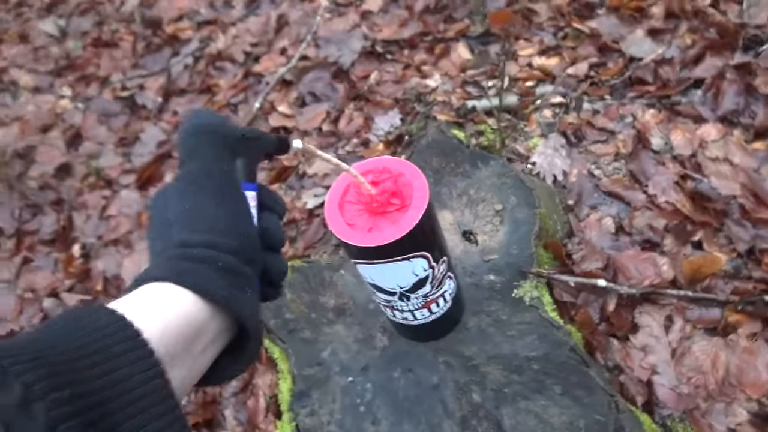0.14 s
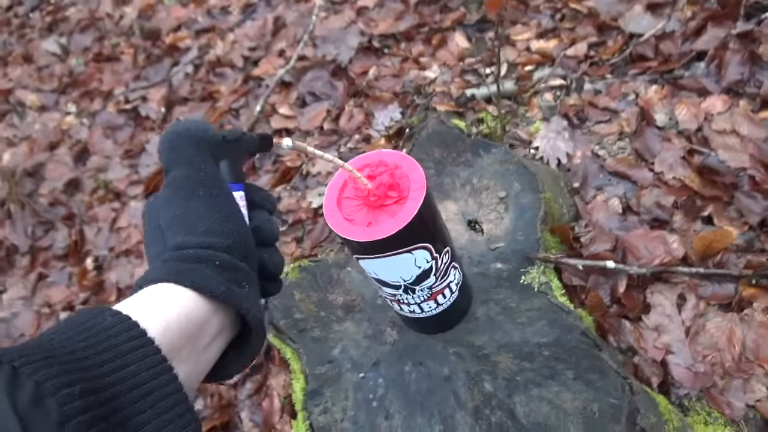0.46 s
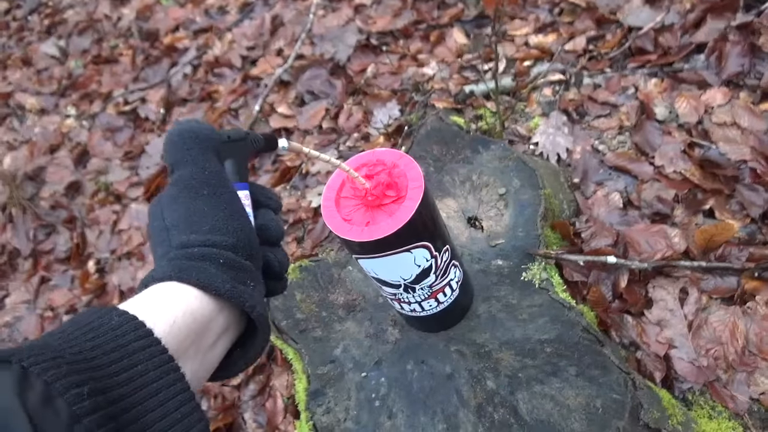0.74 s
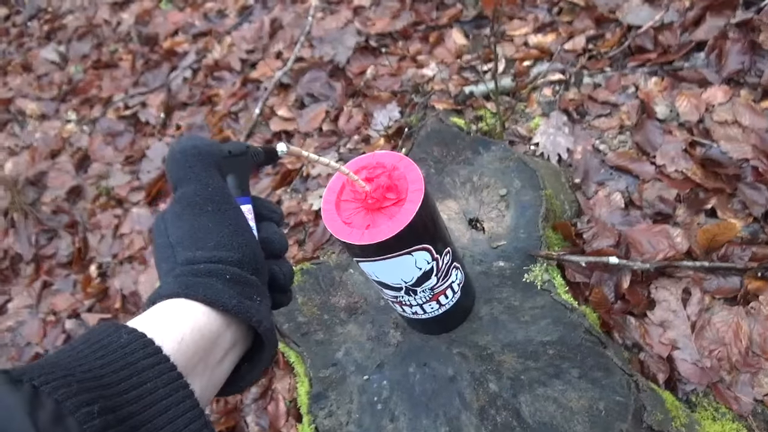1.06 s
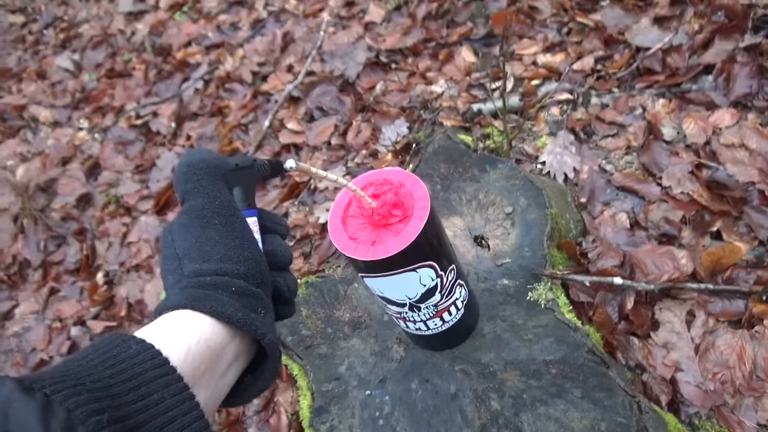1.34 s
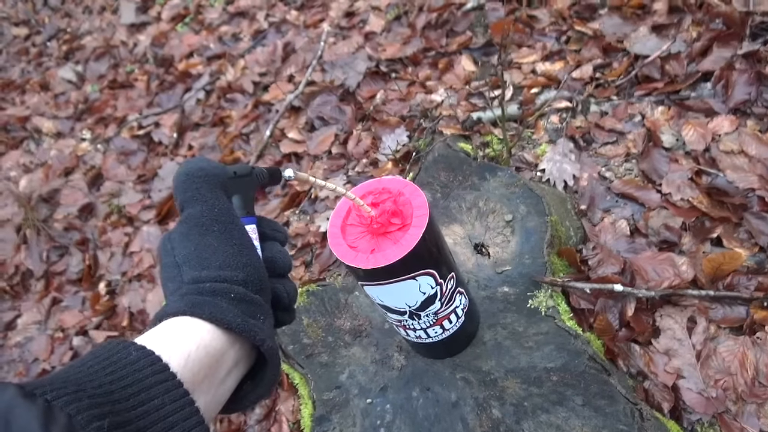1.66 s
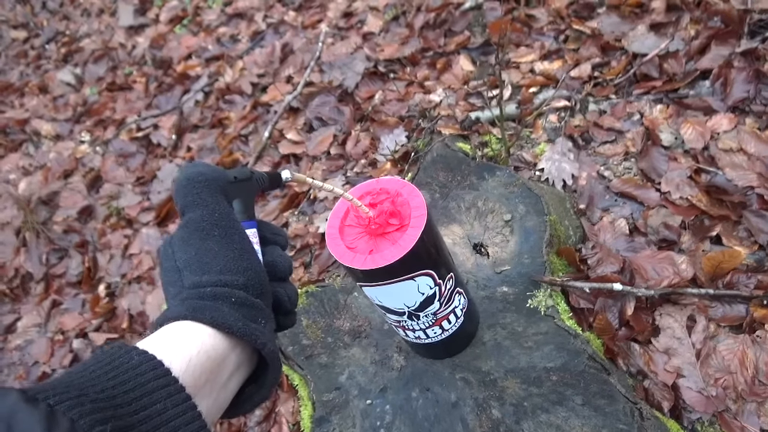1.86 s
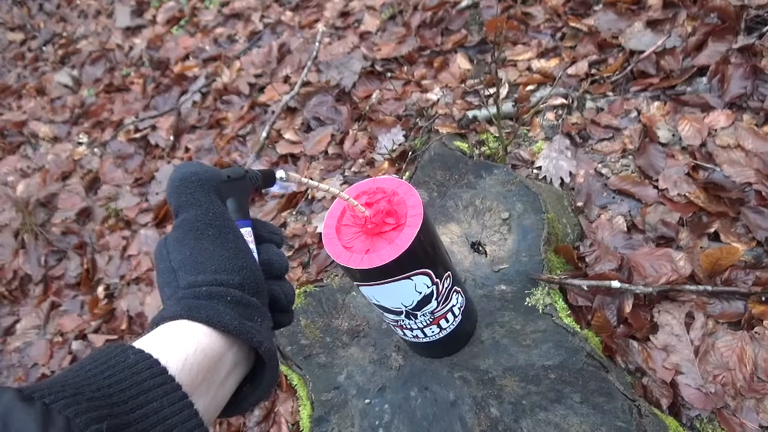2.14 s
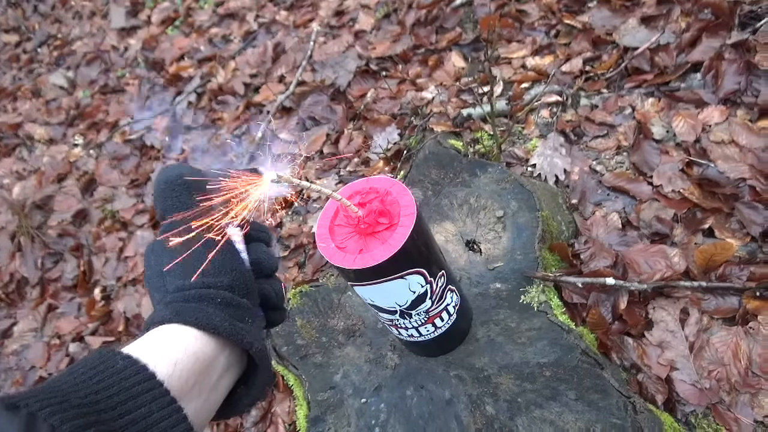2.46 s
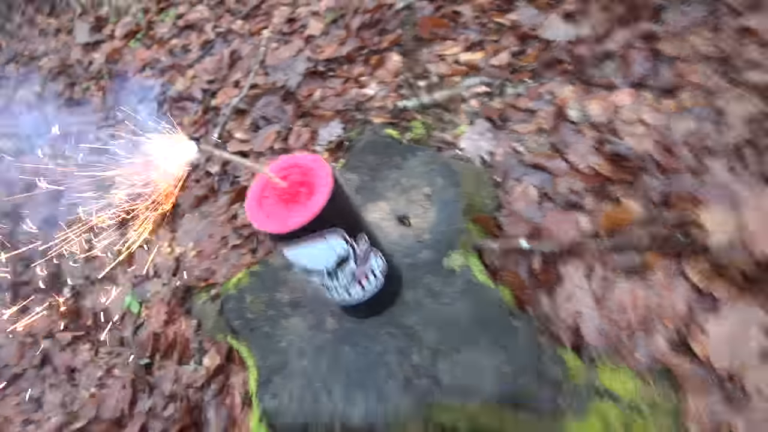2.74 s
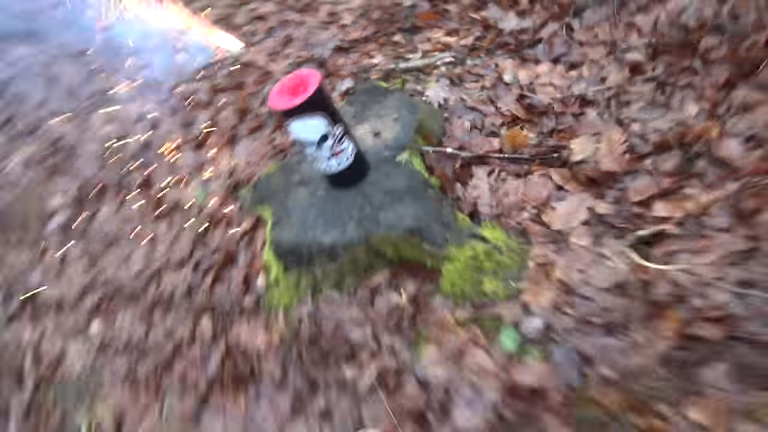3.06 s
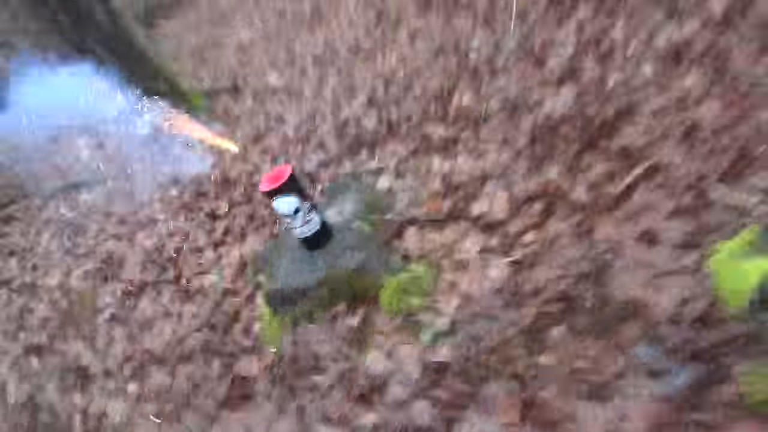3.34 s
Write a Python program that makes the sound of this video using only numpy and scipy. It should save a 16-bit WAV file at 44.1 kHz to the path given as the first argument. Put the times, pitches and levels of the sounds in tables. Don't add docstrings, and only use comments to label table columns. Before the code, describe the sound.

Firework fuse lit in quiet woods: faint gas leak, sharp lighter click, steady soft flame, then a bright spitting burst swelling to a clipped roar, fading as the bumping handheld microphone retreats over crackling leaves.

```python
import sys
import numpy as np
from scipy import signal
from scipy.fft import rfft, irfft
from scipy.io import wavfile
from scipy.ndimage import uniform_filter1d

SR = 44100
rng = np.random.default_rng(int(sys.argv[2]) if len(sys.argv) > 2 else 0)


def wrap_up_sound(samples):
    columns = np.atleast_2d(samples).T
    tamed = np.clip(columns, -1, 1)
    steps = np.round(tamed * 32767).astype(np.int16)
    wavfile.write(sys.argv[1], SR, steps)


def gain_from_db(level_db):
    decades = np.asarray(level_db, float) / 20
    return 10 ** decades


N = 154350
T = np.arange(N) / SR

# frequency [Hz], density [dB per Hz].
WOODS = [(25, 4), (117, -4), (260, -7.5), (400, -9.5), (630, -6.5), (1000, -11.5), (4500, -20),
         (11500, -22)]
# frequency [Hz], density [dB per Hz].
GAS = [(900, -7), (1550, 4.5), (2600, -10.5), (4500, -27), (7100, 0.5), (8400, -6), (9500, -1),
       (11500, -11)]
# frequency [Hz], density [dB per Hz].
FLAME = [(150, -37), (570, -5), (780, -9.5), (1150, 0), (2550, -8), (3100, -15.5), (7500, -21),
         (11300, -30.5)]
# start [s], peak level [dB], pitch [Hz].
TICKS = [(.0224, -35, 6000), (.0734, -30, 4600), (.0784, -28, 3800), (.0844, -33, 5500), (.1516, -28, 6000),
         (.1834, -29, 9000), (.2191, -27, 7000), (.2193, -31, 9800), (.2198, -27, 4400), (.2644, -36, 4500),
         (2.3748, -18, 9500), (2.375, -21, 6300), (2.3752, -21, 4000), (3.372, -12, 9800),
         (3.346, -10, 4500), (3.1071, -7, 5500), (2.3795, -19, 1180)]
# start [s], peak level [dB], pitch [Hz].
CREEP = [
    (.4605, -23, 1970),
    (.4638, -21, 1740),
    (.466, -39, 2500),
]
# time [s], level [dB].
TRIGGER = [
    (.4691, 2),
    (0.4696, 4),
    (0.4703, 2.5),
    (0.4705, 1),
    (0.4741, -5),
    (0.4768, -8),
]
# frequency [Hz], level [dB], 60 dB decay [s].
CASE = [(1630, -7, 0.015), (2070, -14, 0.019), (3610, -5.5, 0.019), (5660, -14, 0.0032),
        (6160, 0.5, 0.0084), (6500, -8, 0.012), (7420, -2, 0.0087), (8230, 1, 0.0057), (9600, -24, 0.012),
        (10700, -30, 0.0087)]
# start [s], level [dB], pitch [Hz], 60 dB decay [s].
JOLTS = [(.471, -27.5, 211, 0.087), (2.376, -31.5, 276, 0.058), (2.374, -29.5, 152, 0.068),
         (2.65, -30, 86.4, 0.11), (2.79, -33, 82, 0.53), (2.901, -24, 72, 0.27), (3.068, -36, 71, 0.15),
         (3.135, -14.5, 85.6, 0.053), (3.2161, -19, 178, .08), (3.221, -9, 90, 0.096),
         (3.262, -28, 60, 0.17), (3.297, -16.5, 89, 0.12), (3.317, -19, 143, 0.16),
         (3.333, -21.5, 96, 0.18), (3.418, -9, 61, 0.07), (3.469, -25, 98, 0.09)]
# time [s], level [dB], stage [0 spit, 0.5 blaze, 1 roar],
# left over right [dB], reflection off the stone [dB].
FUSE = [(2.378, -37, 0.21, 1, 0), (2.41, -25.5, 0.26, 1.5, -3), (2.45, -16.5, 0.021, 0, 4),
        (2.49, -10.5, 0.16, 0, -8), (2.518, -12, 0.15, 1, 3), (2.535, -7.5, 0.015, 1, -1),
        (2.572, -7.5, 0.059, 0.5, -15), (2.592, -10, 0.71, -1, -15), (2.612, -7, 0.38, 1.5, -5),
        (2.67, -6, 0.55, 0.5, 0.5), (2.72, -6.5, 0.8, 2.5, -5), (2.76, -9, 0.86, 2.5, 1.5),
        (2.795, -9, 0.9, 2.5, 1), (2.83, -12.5, 0.96, 2.5, -19), (2.92, -15.5, 1, 4.5, -35),
        (3.1, -19.5, 0.93, 3, -33), (3.5, -28.5, 0.94, 0, -32)]
# frequency [Hz], density [dB per Hz].
SPIT = [(180, -26), (300, -22), (554, -7), (736, -12), (1400, -7), (4400, -9), (6300, -3.5), (7650, 1.5),
        (9000, -4.5), (10700, -6), (13900, -51), (22000, -120)]
# frequency [Hz], density [dB per Hz].
BLAZE = [(120, -41), (200, -12.5), (621, -9.5), (721, -13), (1270, -0.5), (1580, -2.5), (3450, -5),
         (3750, -3), (10700, -4), (13900, -62), (22000, -120)]
# frequency [Hz], density [dB per Hz].
ROAR = [(59, -51), (100, -13), (487, -10), (667, -6.5), (1100, -4), (1550, -0.5), (2050, -5.5), (2330, -3),
        (10700, -19), (13900, -51), (22000, -120)]
# start [s], peak level [dB], pitch [Hz], 60 dB decay [s].
TWIGS = [(2.829, -8, 1550, .02), (2.841, -8, 1500, .014), (2.854, -9, 1520, .025),
         (2.8702, -4.5, 1560, .03), (2.884, -8, 1500, .025), (2.8986, -5, 1600, .012),
         (2.899, -8, 1100, .015), (2.908, -5.5, 1550, .03), (2.917, -8, 1200, .02),
         (2.9645, -11, 1570, .02), (2.9954, -11, 974, .016), (3.0313, -7, 1680, .02),
         (3.031, -9, 1150, .016), (3.0712, -11, 1300, .016), (3.075, -10, 2400, .025),
         (3.1281, -15, 1720, .016), (3.1655, -5.5, 1900, .012), (3.2234, -11, 850, .02),
         (3.2458, -12, 1300, .012), (3.2907, -17, 2400, .02), (3.3286, -14, 1470, .014),
         (3.3985, -6, 1750, .006), (3.3985, -10, 1250, .008), (3.487, -12, 1500, .012)]
# start [s], level [dB], length [s], crispness [dB], left over right [dB].
STEPS = [(2.883, -20.5, 0.13, -9, -2), (3.008, -21, 0.07, -4, 0), (3.086, -31, 0.048, 2, 1),
         (3.145, -22.5, 0.052, -8, -3.5), (3.204, -20, 0.068, -5.5, 0), (3.266, -23.5, 0.15, 0.5, -0.5),
         (3.353, -24, 0.098, -1.5, 0.5), (3.447, -26, 0.12, -0.5, 0.5), (3.48, -35, 0.11, 3, 2)]
# frequency [Hz], density [dB per Hz].
LEAVES = [(120, -22), (200, -5.5), (290, -7.5), (581, -3.5), (1740, -3.5), (2130, -7), (5880, -10.5),
          (10700, -16), (13900, -53), (22000, -120)]
# frequency [Hz], gain [dB].
STONE = [(20, -12), (1500, -12), (2700, -10), (3200, -5), (5800, -5), (8000, -12), (12000, -16)]
# frequency [Hz], gain [dB].
SIDE = [(60, -21.5), (200, -10.5), (600, -16), (1800, -16), (5800, -10.5), (11000, -8.5)]
# centre [s], length [s], depth [dB].
DIPS = [
    (0.227, 0.0048, -10),
    (0.692, 0.013, -8),
]


def level(x, db):
    return x * gain_from_db(db) / np.sqrt(np.mean(x ** 2))


def colour(x, points):
    hz, db = np.array(points, float).T
    f = np.maximum(np.arange(N // 2 + 1) * SR / N, 1)
    gain = gain_from_db(np.interp(np.log(f), np.log(hz), db, -60, -60))
    return irfft(rfft(x) * gain, N)


def walk(rate):
    gap = int(SR / rate)
    count = N // gap + 2
    line = np.interp(np.arange(N) / gap, np.arange(count), rng.standard_normal(count))
    return 0.51 * uniform_filter1d(line, gap // 2)


def ring(x, hz, t60):
    pole = np.exp(2j * np.pi * hz / SR - np.log(1000) / (t60 * SR))
    return signal.lfilter([1, -1], [1, -pole], x).real * SR / (2 * np.pi * hz)


def hiss(points, flicker_db, rate, grit=0.):
    noise = rng.standard_normal(N)
    sparse = rng.random(N) < .02
    grains = rng.standard_normal(N) * sparse * rng.exponential(size=N) * 5
    spectrum = rfft(colour(noise + grit * grains, points))
    log_hz = np.log(np.maximum(np.arange(N // 2 + 1) * SR / N, 1))
    shared = walk(rate)
    out = np.zeros(N)
    for centre in range(3, 11):
        band = irfft(spectrum * np.clip(1 - abs(log_hz - centre), 0, 1), N)
        out += band * gain_from_db(flicker_db * (0.42 * shared + walk(rate)))
    return level(out, 0)


def bursts(table, cycles, t60=None):
    size = 900
    out = np.zeros(N)
    for (start, db, hz, *own), noise in zip(table, rng.standard_normal((len(table), size))):
        fade = np.exp(-np.arange(size) / SR * np.log(1000) / (t60 or own[0]))
        knock = ring(ring(noise * fade, hz, cycles / hz), hz, cycles / hz)
        i = int(start * SR)
        out[i:i + size] += (knock * gain_from_db(db) / abs(knock).max())[:N - i]
    return out


def mirrored(x, db):
    delay_s = .00215
    return x + gain_from_db(db) * colour(np.roll(x, round(delay_s * SR)), STONE)


def stereo(x, pan_db=0., wide_db=0., smear_s=0.014):
    tail = rng.standard_normal(4000) * np.exp(-np.arange(4000) / SR / smear_s)
    smeared = signal.fftconvolve(x, tail / np.sqrt(np.sum(tail ** 2)))[:N]
    side = colour(smeared, SIDE) * gain_from_db(wide_db)
    return np.array([(x + side) * gain_from_db(pan_db / 2), (x - side) * gain_from_db(-pan_db / 2)])


def woods():
    return gain_from_db(-44.5 + np.interp(T, (.2, .25), (1.5, 0))) * hiss(WOODS, 1., 5.37)


def gas():
    off_s, fade_s = .47, 0.0088
    return gain_from_db(-45.5) * hiss(GAS, 0.52, 13) * np.clip((off_s - T) / fade_s, 0, 1)


def ticks():
    return bursts(TICKS, 5.2, 0.0031)


def flame():
    on_s, rise_s, off_s, fall_s = 0.437, 0.076, 2.44, 0.018
    lit = np.clip((T - on_s) / rise_s, 0, 1) * np.clip((off_s - T) / fall_s, 0, 1)
    jet = level(mirrored(hiss(FLAME, 0.65, 8.0, grit=0.022), 0), -33.5)
    flash_fade = (T > .47) * np.exp(-np.maximum(T - .472, 0) / 0.42)
    return lit * jet + flash_fade * gain_from_db(-44) * hiss(SPIT, 1., 22)


def trigger():
    creep = bursts(CREEP, 8., .008)
    hits = np.zeros(N)
    for (start, db), noise in zip(TRIGGER, rng.standard_normal((len(TRIGGER), 40))):
        i = int(start * SR)
        hits[i:i + 40] += gain_from_db(db) * np.sign(noise) * np.exp(-np.arange(40))
    case = sum(gain_from_db(db) * ring(hits, hz, t60) for hz, db, t60 in CASE)
    click = case * gain_from_db(7) / abs(case).max()
    since = np.maximum(T - .472, 0)
    thump = gain_from_db(-19) * np.sin(2 * np.pi * 135 * since) * np.exp(-since / 0.0068)
    tail_fade = (T > .4695) * np.exp(-(T - .4695).clip(0) / .0075)
    tail = gain_from_db(-14.5) * tail_fade * hiss(SPIT, 0.87, 300)
    return creep + click + thump + tail


def camera():
    rise_s, sag = 0.0059, 0.26
    rumble = hiss([(20, 6), (90, 1.5), (250, -21), (500, 2.5)], 5.2, 5.7)
    out = rumble * gain_from_db(np.interp(T, (2.3, 2.48, 2.9, 3.3), (-70, -42.5, -34, -30)))
    for start, db, hz, t60 in JOLTS:
        since = np.maximum(T - start, 0)
        tone = np.sin(2 * np.pi * hz * since * (1 - sag * since / (since + t60)))
        fade = np.exp(-since * np.log(1000) / t60) * np.minimum(since / rise_s, 1)
        out += gain_from_db(db) * tone * fade
    return out


def fuse():
    times, *columns = np.array(FUSE).T
    db, stage, pan_db, echo_db = (np.interp(T, times, column) for column in columns)
    stage = 2 * np.clip(stage, 0, 1)
    spit, blaze, roar = (np.sqrt(np.clip(1 - abs(stage - k), 0, 1)) for k in range(3))
    burn = spit * hiss(SPIT, 0.54, 39.1, grit=0.066)
    burn += blaze * hiss(BLAZE, 0.84, 25.67, grit=0.066)
    burn += roar * hiss(ROAR, 0.93, 22.38, grit=0.05)
    return stereo(mirrored(burn, echo_db) * gain_from_db(db) * (T > times[0]), pan_db, -2.5)


def twigs():
    return bursts(TWIGS, 13.)


def leaves():
    crush = hiss(LEAVES, 1.6, 30.35, grit=0.12)
    starts, levels, lengths, crispness, pans = np.array(STEPS).T
    swell = np.zeros(N)
    for start, db, length in zip(starts, levels, lengths):
        u = np.maximum(T - start, 0) / length
        swell += gain_from_db(db) * 4 * u * np.exp(.5 - 2 * u)
    dull = signal.sosfiltfilt(signal.butter(2, 3140, fs=SR, output="sos"), crush)
    crisp = (crush - dull) * gain_from_db(np.interp(T, starts + 0.028, crispness))
    return stereo((dull + crisp) * swell, np.interp(T, starts, pans), 1)


def scene():
    out = stereo(woods(), 0.5, 5.6)
    out += stereo(gas() + flame() + trigger(), 0.26, -1.1, 0.0078)
    out += stereo(ticks(), 0, 0.92, .003)
    out += stereo(camera(), 0, -1.3)
    out += fuse()
    out += stereo(twigs(), 1.1, 0, .003)
    return out + leaves()


def band_limit(x):
    return signal.sosfilt(signal.butter(12, 15800, fs=SR, output="sos"), x)


def record(dry):
    for centre, length, db in DIPS:
        dry = dry * gain_from_db(db * np.clip(1.5 - abs(T - centre) / length * 2, 0, 1))
    top_cut = signal.ellip(12, .1, 90, 11000, fs=SR, output="sos")
    mix = np.clip(signal.sosfilt(top_cut, dry), -1, 1)
    return band_limit(mix)


dry = scene()
out = record(dry)
wrap_up_sound(out)
```